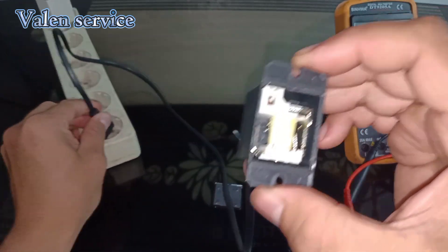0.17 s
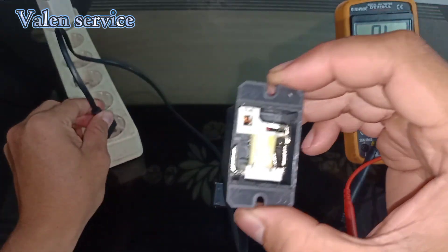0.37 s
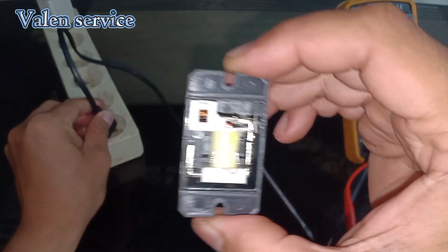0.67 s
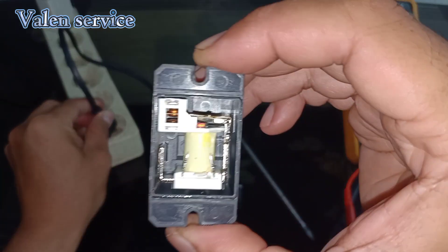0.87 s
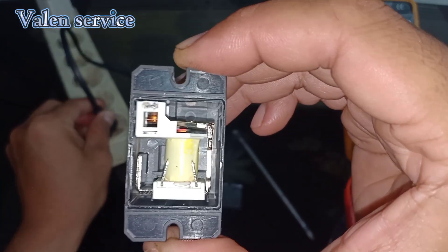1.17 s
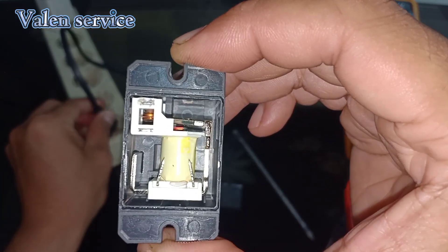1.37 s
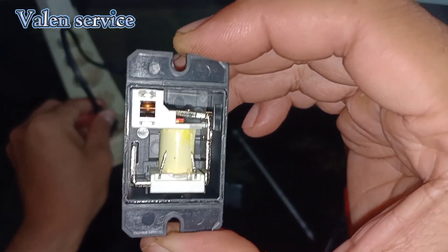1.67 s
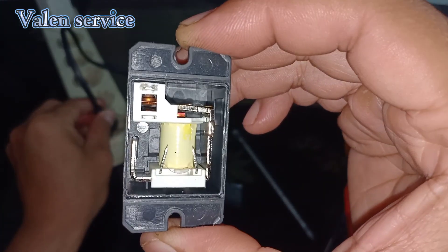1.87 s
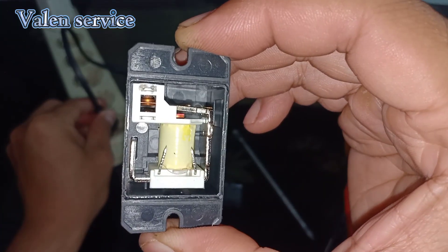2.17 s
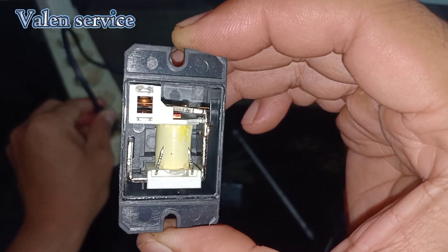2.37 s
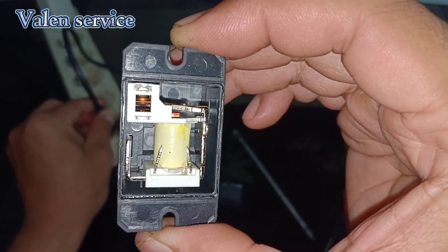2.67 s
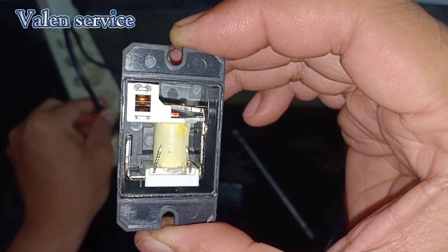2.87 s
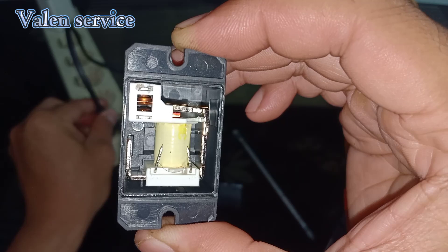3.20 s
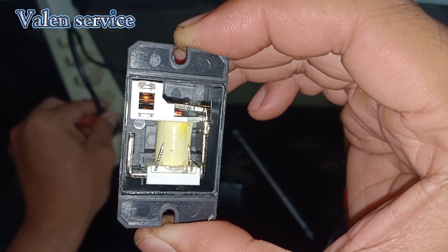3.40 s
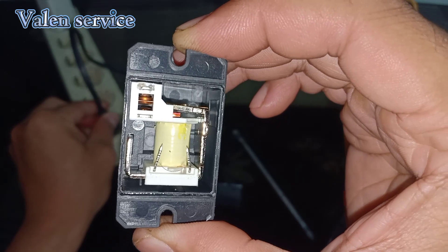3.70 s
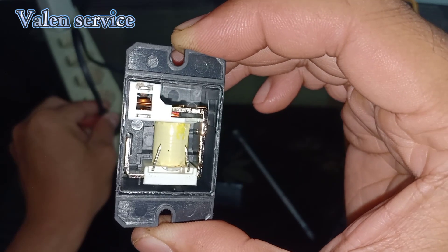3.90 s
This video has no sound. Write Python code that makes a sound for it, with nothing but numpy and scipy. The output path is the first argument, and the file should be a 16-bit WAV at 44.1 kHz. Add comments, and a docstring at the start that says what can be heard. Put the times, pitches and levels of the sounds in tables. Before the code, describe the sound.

At the very start a soft knock with a small hollow ping and a light tick dies away within about 0.3 seconds, along with a few barely audible high squeaks. A very quiet background runs throughout: a distant, hollow, slightly wavering drone, a thin steady high whine, a fine hiss and a trace of low handling rumble. At about 3.4 seconds a plug makes a small, dull tick with a tiny ping in a power strip. At about 3.9 seconds a small relay pulls in with one sharp, bright metallic click, close to the microphone and by far the loudest sound. Its contacts bounce so quickly that it is heard as a single snap. A faint metallic ring and the short tail of a small workshop follow as the sound ends.

```python
"""Relay click in a quiet workshop

A small relay pulls in once, close up and near the end: armature tick, blow, contact bounces, then
ringing metal and a short room tail. The bed is a far, hollow drone, soft handling rumble and a thin
whine like a distant insect chorus. A knock dies away at the start, with faint ticks, pings and squeaks.
A limiter ducks under the blow, and a fine hiss lies over everything."""
import sys
import numpy as np
from scipy import signal
from scipy.fft import rfft, irfft, next_fast_len
from scipy.io import wavfile
from scipy.ndimage import uniform_filter1d, minimum_filter1d, map_coordinates

SR = 44100
rng = np.random.default_rng(int(sys.argv[2]) if len(sys.argv) > 2 else 0)


def pcm_store(signal):
    """Save signal as 16-bit PCM."""
    levels = np.round(np.clip(np.atleast_2d(signal), -1, 1) * 32767)
    wavfile.write(sys.argv[1], SR, levels.astype(np.int16).T)


N = 178384

# Colour of the far drone: freq_hz, gain_db
DRONE_EQ = [(15, -52), (25, -29), (43, -30), (97, -19.5), (159, -37.5), (184, -20), (238, -22), (314, -9.5),
            (398, -10.5), (437, -12), (506, -8), (730, 4.5), (926, -10), (1290, -0.5), (2000, -15),
            (2600, -60), (4400, -120)]
# Fader rides on the drone: time_s, level_db, gap_offset_db, upper_offset_db
DRONE_RIDES = [(0.1, -54.5, -11.5, -4.5), (0.71, -59.5, -0.5, -2.5), (0.76, -53, -8.5, -9),
               (1.04, -61.5, -1.5, 0.5), (1.23, -58.5, -8, -8), (1.27, -71, 9.5, 7.5), (1.33, -60.5, 1, -4),
               (2.17, -54, -17, -4.5), (2.31, -57.5, 1.5, -1.5), (2.37, -57, -16.5, -7),
               (3.02, -60, -5.5, 0.5), (3.04, -56.5, -1, -5), (3.29, -59.5, -17, -1), (3.4, -51.5, -10, -7),
               (3.79, -57, -11, -7), (3.9, -57.5, -7, -2)]
# Drone bands: low_hz, high_hz, gain_db, ride (0 plain, 1 gap, 2 upper), drift_db
DRONE_BANDS = [(0, 560, -18, 0, 8), (567.4, 880, 0, 0, -0.5), (869.4, 1100, 0.5, 1, -1.5),
               (1107, 1550, 1.5, 2, 0), (1600, 2100, -11.5, 2, -1)]
# Fuzzy held tones in the drone: pitch_hz, width_hz, level_db
DRONE_TONES = [(744, 44, -63), (1205, 26, -66.5), (1321, 30, -67), (2383, 8.8, -62.5)]
# Hollow resonances swelling in the drone: start_s, length_s, level_db, pitch_hz
HOLLOW_SWELLS = [(0.014, 0.07, -56.5, 327), (0.144, 0.16, -58, 328), (0.591, 0.21, -64, 319),
                 (1.042, 0.048, -62, 350), (1.862, 0.11, -59.5, 324), (2.466, 0.03, -61.5, 315.5),
                 (3.021, 0.064, -59.5, 322), (3.412, 0.058, -57, 340), (3.64, 0.23, -64, 318),
                 (0.263, 0.078, -60.5, 440), (0.405, 0.028, -65, 428), (0.946, 0.14, -58.5, 436),
                 (1.357, 0.028, -65, 422), (2.965, 0.13, -62, 437), (3.458, 0.2, -60.5, 447),
                 (3.755, 0.053, -60.5, 488), (3.967, 0.071, -59.5, 425), (0.176, 0.03, -75, 185),
                 (0.257, 0.029, -70.5, 200), (0.716, 0.033, -69, 207), (1.435, 0.056, -67.5, 205),
                 (1.79, 0.078, -67.5, 202), (3.231, 0.19, -66, 187.6)]
# Their murmur between swells: pitch_hz, width_hz, level_db
HOLLOW_MURMUR = [(196.4, 12.6, -80.5), (333.4, 85, -77.5), (473, 17, -74.5)]
# Hand and cable movement: start_s, length_s, level_db, pitch_hz
RUMBLE_SWELLS = [(0, 0.048, -72, 114), (.15, 0.12, -65, 124), (.68, 0.21, -79.5, 104),
                 (1.33, 0.11, -77, 105), (2.16, 0.067, -73.5, 61.4), (2.4, 0.23, -79, 52.6),
                 (2.45, 0.23, -80, 104), (3.72, .1, -77.5, 108)]
# Constant low rumble: pitch_hz, width_hz, level_db
RUMBLE_BED = [(52, 17, -91.5), (112.5, 53, -84.5)]
# Colour of the whine: freq_hz, gain_db
WHINE_EQ = [(1150, -57), (1950, -37.5), (2110, -4), (2310, 8.5), (2410, 10), (2480, 6), (2650, -15.5),
            (2750, -30.5), (2900, -28), (3770, -86), (6380, -120)]
# Fader ride on the whine: time_s, level_db
WHINE_RIDE = [(0.1, -55.5), (0.65, -57), (0.81, -56.5), (1.67, -56.5), (1.77, -57), (2.77, -55),
              (2.86, -56.5), (3.76, -56.5), (3.9, -57)]
# Colour of the opening knock: freq_hz, gain_db
KNOCK_EQ = [(180, -41), (300, -9), (437, -16), (574, 6.5), (1290, 6), (1800, 2), (1940, -2), (2260, 2),
            (2830, -9), (5670, -24), (6590, -35), (9320, -39), (11000, -46), (14300, -81), (22000, -120)]
# Small hollow rings: start_s, pitch_hz, level_db, t60_s
PINGS = [(0, 1030, -34, 0.084), (3.409, 3370, -45, 0.045), (3.41, 2930, -55, 0.072),
         (3.41, 1500, -43, 0.044)]
# A plug ticking in the socket strip: start_s, level_db, t60_s, dull (0 or 1)
PLUG_TICKS = [(.008, -46.5, 0.14, 0), (3.412, -50, 0.32, 1)]
# Colour of the bright tick: freq_hz, gain_db
BRIGHT_TICK_EQ = [(1650, -51), (2800, -25), (3400, 4.5), (4290, -6), (4530, -4), (4840, -7), (5210, -6),
                  (6530, -35), (7790, -44), (8180, -27), (9350, -18.5), (11000, -46), (12000, -35),
                  (15600, -71), (22000, -120)]
# Colour of the dull tick: freq_hz, gain_db
DULL_TICK_EQ = [(290, -43), (500, -19), (702, -2), (862, -5), (1030, 4), (1300, -23), (1480, 1), (2010, 0),
                (2290, -11), (2720, -25), (2920, -22), (3100, -24), (3380, -13), (3630, -34), (9000, -39),
                (11700, -75), (19800, -120)]
# Thin, faint squeaks: start_s, end_s, pitch_hz, level_db
THIN_SQUEAKS = [(.06, .17, 4580, -80), (.16, .25, 4830, -80), (.24, .34, 3694, -81), (.12, .18, 5650, -85),
                (.19, .31, 5470, -87)]
# Armature ticks, blow and contact bounces: start_s, gain_db, brightness_db
RELAY_HITS = [(3.9151, -20, -9), (3.9159, -21, -9), (3.9174, -22, -2), (3.9176, 4, 4), (3.9197, -18, -8),
              (3.9207, -19, -5), (3.9218, -14, -3), (3.9227, -17, -8), (3.9236, -19, -8), (3.9262, -22, -5)]
# Modes of the armature, springs and case: pitch_hz, gain_db, t60_s
RELAY_MODES = [(1930, -26, .012), (2750, -15, .009), (3763, -16, .011), (4900, -8, .0045),
               (5755, -3, .0042), (6546, -4, .0042), (9600, -12, .0035), (10700, 0, .0048),
               (11700, -5, .0035), (14200, -14, .004), (15800, -24, .003)]
# Long-ringing metal parts: pitch_hz, width_hz, level_db, t60_s
METAL_RINGS = [(3770, 18, -49, 0.6), (5940, 60, -55, .8), (10600, 150, -44, 0.4)]
# Colour of the click as the room returns it: freq_hz, gain_db
ROOM_EQ = [(880, -45), (1500, -34), (1620, 1), (1770, -12.5), (2280, -4.5), (2570, -13), (2800, 0),
           (3480, -12), (3800, 1.5), (4390, -4.5), (7090, 1), (8050, -16), (10700, -5), (14300, -11.5),
           (15500, -19)]
# Decay of the workshop: freq_hz, t60_s
ROOM_DECAY = [(1500, 0.65), (4000, 0.43), (7000, 0.4), (12000, 0.33)]
# Colour of the hiss: freq_hz, gain_db
HISS_EQ = [(1710, -29), (2900, -7.5), (3240, -8.5), (5260, -10.5), (6500, -12.5), (7070, -7.5), (7850, -16),
           (14700, -16), (15500, -17)]

TIME = np.arange(N) / SR
BLOW_S = RELAY_HITS[3][0]
NOISE_TOP_HZ, MIX_TOP_HZ = 15570, 16990


def amp(db):
    return 10 ** (np.asarray(db) / 20)


def unit_rms(x):
    return x / np.sqrt(np.mean(x ** 2) + 1e-20)


def along(points, hz):
    """Read a curve of (freq_hz, value) points on a log frequency axis."""
    freqs, values = np.transpose(points)
    return np.interp(np.log(hz + 1), np.log(freqs + 1), values)


def rides(rows):
    """One fader curve for each column after the time."""
    times, *columns = np.transpose(rows)
    return [np.interp(TIME, times, column) for column in columns]


def since(start_s):
    """Seconds after start_s; zero before it."""
    return np.maximum(TIME - start_s, 0)


def filtered(x, response):
    """EQ x with a gain given as a function of frequency."""
    size = next_fast_len(len(x) + 8192)
    return irfft(rfft(x, size) * response(np.fft.rfftfreq(size, 1 / SR)), size)[:len(x)]


def noise(eq, patchy_db=0, holes_db=0):
    """Coloured noise of rms 1, mottled with broad patches of random gain and small dark holes."""
    cells = signal.stft(rng.standard_normal(N), nperseg=1024)[2]

    def blotches(bins, frames):
        field = uniform_filter1d(rng.standard_normal(cells.shape), bins, axis=0)
        return unit_rms(uniform_filter1d(field, frames, axis=1))

    mottle_db = patchy_db * blotches(6, 10) - holes_db * np.maximum(blotches(3, 5) - .3, 0)
    mottled = signal.istft(cells * amp(mottle_db), nperseg=1024)[1][:N]
    low_hz, high_hz = eq[0][0], min(eq[-1][0], NOISE_TOP_HZ)
    return unit_rms(filtered(mottled, lambda hz: amp(along(eq, hz)) * (hz > low_hz) * (hz < high_hz)))


def band(hz, width_hz, size=N):
    """Narrow noise with steep flanks: a wavering tone."""
    return unit_rms(filtered(rng.standard_normal(size), lambda f: np.exp(-((f - hz) / width_hz) ** 2)))


def held_tones(rows):
    """A bed of sustained narrow noises."""
    return sum(amp(db) * band(hz, width_hz) for hz, width_hz, db in rows)


def swells(rows, width_ratio, edge_s):
    """Narrow noises that rise, hold and fall, each inside one second."""
    out = np.zeros(N + 2 * SR)
    from_middle_s = np.abs(np.arange(SR) / SR - .5)
    for start_s, length_s, db, hz in rows:
        outside_s = np.maximum(from_middle_s - length_s / 2, 0)
        envelope = amp(db) * np.exp(-(outside_s / edge_s) ** 2)
        out[round((start_s + length_s / 2) * SR):][:SR] += envelope * band(hz, width_ratio * hz, SR)
    return out[SR // 2:][:N]


def drone(crossfade_hz=60, drift_knots_per_s=4.146):
    """Far drone: bands of mottled noise ride the faders and drift apart, around fuzzy held tones."""
    air = noise(DRONE_EQ, patchy_db=2.5, holes_db=18.5)
    level_db, gap_db, upper_db = rides(DRONE_RIDES)
    ride_db = [level_db, level_db + gap_db, level_db + upper_db]
    out = np.zeros(N)
    for low_hz, high_hz, db, ride, drift_db in DRONE_BANDS:
        def window(hz):
            inside_hz = np.minimum(hz - low_hz, high_hz - hz)
            return np.sqrt(np.clip(.5 + inside_hz / crossfade_hz, 0, 1))

        drift = map_coordinates(rng.standard_normal(64), [TIME * drift_knots_per_s])
        out += amp(ride_db[round(ride)] + db + drift_db * drift) * unit_rms(filtered(air, window))
    return out + held_tones(DRONE_TONES)


def hollow_resonances():
    """Hollow tones swell out of a murmur, each in a broader, softer halo."""
    murmur = held_tones(HOLLOW_MURMUR)
    cores = swells(HOLLOW_SWELLS, width_ratio=.06, edge_s=.012)
    halos = swells(HOLLOW_SWELLS, width_ratio=.29, edge_s=.087)
    return murmur + cores + amp(-9) * halos


def handling_rumble():
    """Hand and cable movement: soft bumps over a low bed."""
    return held_tones(RUMBLE_BED) + swells(RUMBLE_SWELLS, width_ratio=.31, edge_s=.029)


def whine():
    """A thin, shimmering band of noise, like a distant insect chorus."""
    return amp(rides(WHINE_RIDE)[0]) * noise(WHINE_EQ, patchy_db=1.4, holes_db=1)


def knock(fade_s=.27):
    """The tail of a knock, falling away faster and faster."""
    return amp(-49 - 60 * (TIME / fade_s) ** 2) * noise(KNOCK_EQ, holes_db=2)


def pings(attack_s=.0042):
    """Small hollow rings: decaying sines with a little fuzz."""
    out = np.zeros(N)
    for start_s, hz, db, t60 in PINGS:
        t = since(start_s)
        tone = np.sin(2 * np.pi * hz * TIME) + .11 * band(hz, 84)
        out += amp(db - 60 * t / t60) * (1 - np.exp(-t / attack_s)) * tone
    return out


def plug_ticks(attack_s=.001):
    """A plug ticks in the socket strip: faint noise bursts with a short tail."""
    out = np.zeros(N)
    for start_s, db, t60, dull in PLUG_TICKS:
        t = since(start_s)
        burst = noise(DULL_TICK_EQ if dull else BRIGHT_TICK_EQ)
        out += amp(db - 60 * t / t60) * (1 - np.exp(-t / attack_s)) * burst
    return out


def squeaks():
    """Faint, high tones that swell and fade in one arch."""
    out = np.zeros(N)
    for start_s, end_s, hz, db in THIN_SQUEAKS:
        progress = np.clip((TIME - start_s) / (end_s - start_s), 0, 1)
        out += amp(db) * np.sin(np.pi * progress) * band(hz, width_hz=60)
    return out


def relay(bright_above_hz=8000):
    """Every hit rings the same metal modes with a spit of rattle; the hard blow is the brightest."""
    out, t = np.zeros(N + SR), np.arange(SR // 10) / SR
    for start_s, hit_db, brightness_db in RELAY_HITS:
        ring = np.zeros(len(t))
        for k, (hz, mode_db, t60) in enumerate(RELAY_MODES):
            db = mode_db + brightness_db * (hz > bright_above_hz) + rng.normal(0, 1)
            attack = 1 - np.exp(-(t * (hz + 2000) / 5.2) ** 2)  # high modes speak first
            ring += (-1) ** k * amp(db - 60 * t / t60) * attack * np.sin(2 * np.pi * hz * t)
        rattle = amp(-24 - 60 * t / .012) * (1 - np.exp(-t / .0004)) * rng.standard_normal(len(t))
        out[round(start_s * SR):][:len(t)] += amp(hit_db) * (ring + rattle)
    # so small a body radiates no bass
    return signal.sosfilt(signal.butter(4, 1200, "high", fs=SR, output="sos"), out[:N])


def metal_ring(attack_s=.0036):
    """A few metal parts ring on, wavering, after the blow."""
    t = since(BLOW_S)
    ring = sum(amp(db - 60 * t / t60) * band(hz, width_hz) for hz, width_hz, db, t60 in METAL_RINGS)
    return ring * (1 - np.exp(-t / attack_s))


def room_tail(bloom_s=.014):
    """The workshop's answer blooms after the blow; the highs die first."""
    hz, frame_s, cells = signal.stft(noise(ROOM_EQ), SR, nperseg=256)
    decay_db = -60 * np.maximum(frame_s - BLOW_S, 0) / along(ROOM_DECAY, hz)[:, None]
    tail = signal.istft(cells * amp(decay_db), SR, nperseg=256)[1][:N]
    bloom = 1 - np.exp(-(since(BLOW_S) / bloom_s) ** 2)
    return amp(-31) * tail * bloom


def limiter(x, threshold_db=-12, slope=.4, release_s=.03):
    """Ducks by a share of each peak's overshoot, then lets go exponentially."""
    over_db = np.maximum(20 * np.log10(np.abs(x) + 1e-9) - threshold_db, 0)
    held_db = -minimum_filter1d(-over_db, size=89)  # 2 ms peak hold
    release = -TIME / release_s
    released_db = np.exp(np.maximum.accumulate(np.log(held_db + 1e-9) - release) + release)
    return x * amp(-slope * uniform_filter1d(released_db, size=44))


def soft_clip(x, ceiling=.5):
    """The highest peaks flatten, adding overtones but no bass."""
    flattened = x / (1 + np.abs(x / ceiling) ** 4) ** (1 / 4)
    return x + filtered(flattened - x, lambda hz: np.clip(hz / 1500, 0, 1) ** 2)


def scene():
    """Mono mix of the bed, the small noises and the relay click."""
    bed = drone() + hollow_resonances() + handling_rumble() + whine()
    small_noises = knock() + pings() + plug_ticks() + squeaks()
    click = relay() + metal_ring() + room_tail()
    return (bed + small_noises + click)[None]


def record(dry):
    """Output chain: limiter, soft clip, hiss and a steep high cut."""
    limited = soft_clip(limiter(dry[0]))
    hiss = amp(-82.5) * noise(HISS_EQ, patchy_db=1.7)
    return filtered(limited + hiss, lambda hz: np.clip((MIX_TOP_HZ - hz) / 400, 0, 1) ** 2)[None]


dry = scene()
out = record(dry)
pcm_store(out)
```